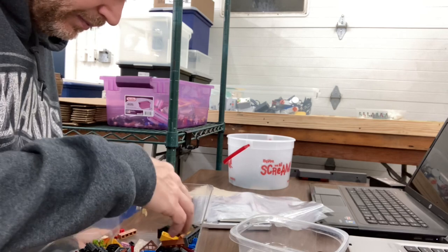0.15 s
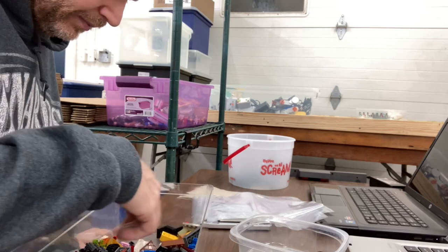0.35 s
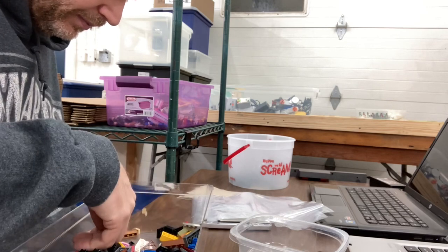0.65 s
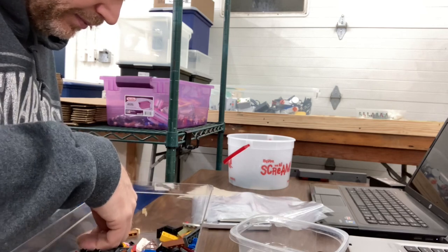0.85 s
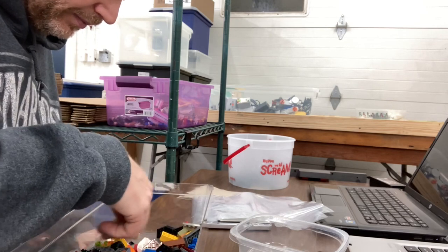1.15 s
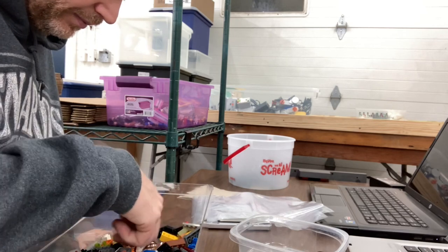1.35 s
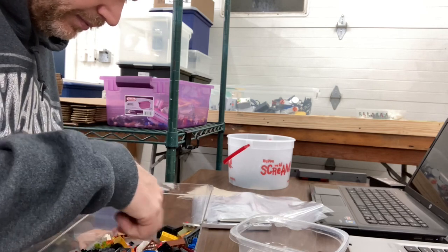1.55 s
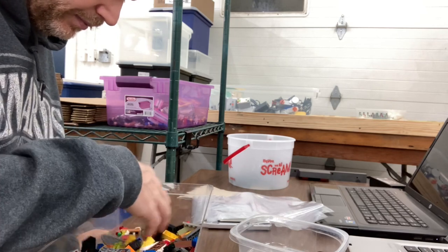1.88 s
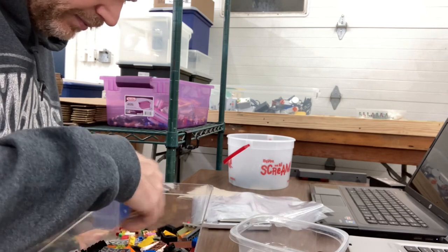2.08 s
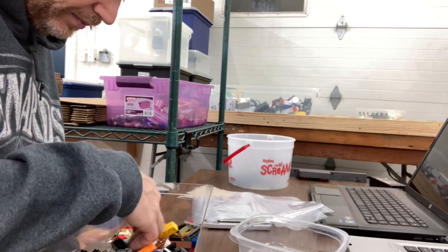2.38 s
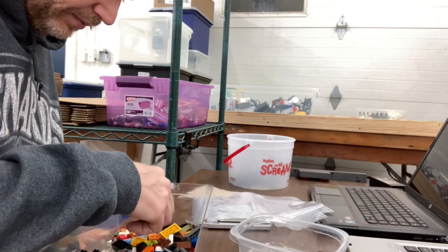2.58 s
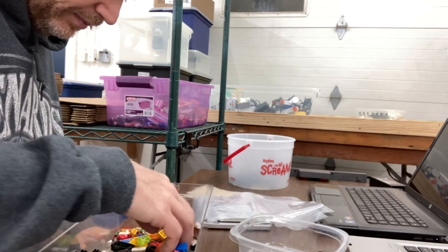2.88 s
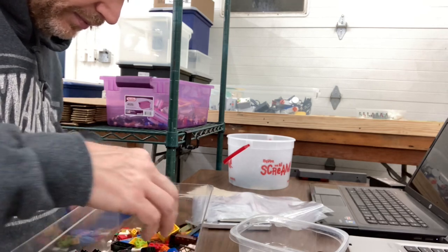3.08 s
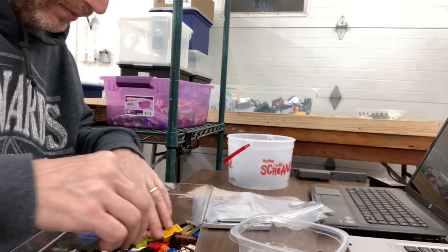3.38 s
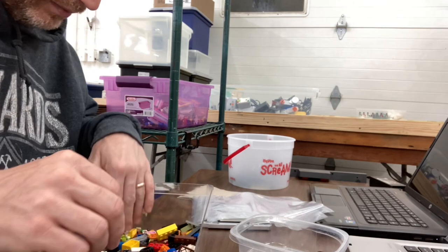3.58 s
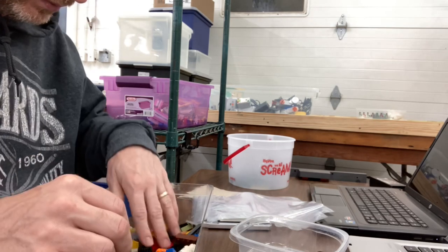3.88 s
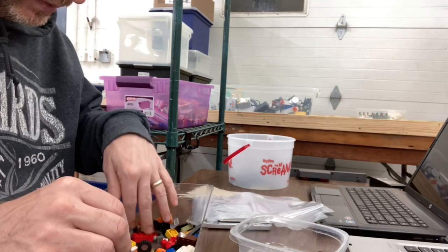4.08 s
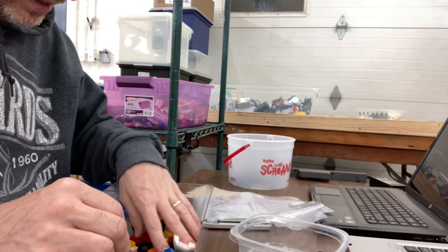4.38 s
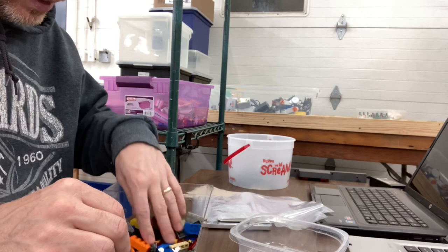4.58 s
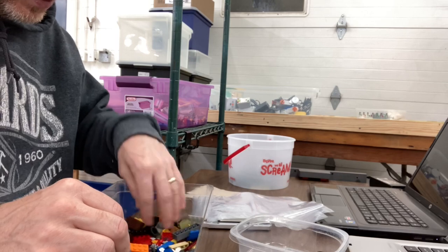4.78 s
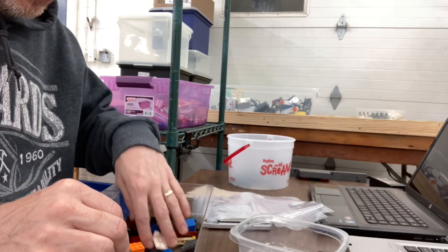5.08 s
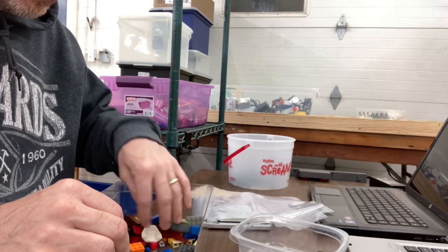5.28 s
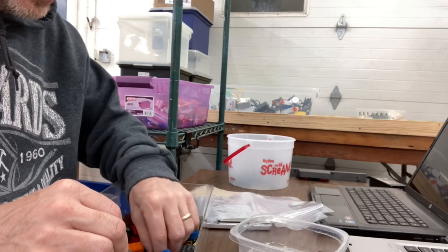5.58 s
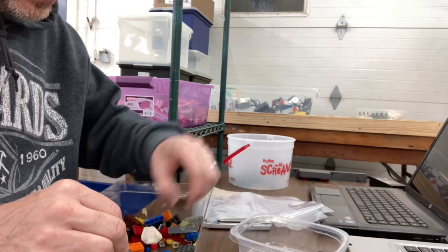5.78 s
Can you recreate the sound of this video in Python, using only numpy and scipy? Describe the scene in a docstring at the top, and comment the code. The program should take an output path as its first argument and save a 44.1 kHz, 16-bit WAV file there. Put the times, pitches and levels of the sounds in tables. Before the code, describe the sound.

Close stereo sound of hands stirring loose plastic toy bricks in a plastic tub, in a modest hard-walled workroom. It opens at once with a loud, crunchy clattering stroke that falls off by about 0.2 s, followed by lighter, scattered clicks and small rattles, notably near 0.5, 0.86 and 1.3 s, with near silence between. Heavy raking starts at 1.67 s: dense showers of bright, dry ticks and clacks over a hollow midrange tub rattle, dipping around 2.0 s, surging at 2.3 s and again near 2.9 s. It thins to almost nothing around 3.2 s. From 3.4 s it returns in uneven strokes, stronger from 3.8 to 4.2 s, again from 4.35 s and around 5 s. A firm clack with a dull bump lands at 5.5 s, then the last pieces settle by 5.7 s. Faint, steady low room tone lies underneath, with short reflections.

```python
"""A hand rakes through loose plastic toy bricks in a plastic tub on a workbench, close to a two-port microphone.
A loud stroke opens; lighter, sparser ones follow until 1.3 s. Heavy raking runs from 1.67 s, thins out
around 3.2 s, returns at 3.4 s and dies away by 5.7 s, over steady room tone throughout.
Strokes drive showers of decaying modes (bricks, tub, studs, bench); clacks are bursts of contacts that
ring the same pieces; bumps are sinking sines; room tone and reflections are shaped noise."""
import sys
import numpy as np
from scipy import signal
from scipy.fft import rfft, irfft, next_fast_len
from scipy.io import wavfile
from scipy.ndimage import uniform_filter1d

SR = 44100
rng = np.random.default_rng(int(sys.argv[2]) if len(sys.argv) > 2 else 0)


def master(y):
    """Save y as 16-bit WAV."""
    cut = np.clip(np.atleast_2d(y).T, -1, 1)
    pcm = np.round(cut * 32767)  # scale
    wavfile.write(sys.argv[1], SR, pcm.astype(np.int16))


N = 261954  # samples


def gain_of(db):
    """Amplitude factor of a level in dB."""
    return 10 ** (np.asarray(db) / 20)


def evened(x):
    """Scale to RMS 1."""
    return x / np.sqrt(np.mean(x ** 2) + 1e-20)


def read(points, hz):
    """Read a (freq_hz, value) curve, linear over log frequency."""
    freq_hz, value = np.transpose(points)
    return np.interp(np.log(hz + 1), np.log(freq_hz + 1), value)


def add(mix, start_s, sound):
    """Add a sound into the mix in place, cut at the end."""
    part = mix[round(start_s * SR):][:len(sound)]
    part += sound[:len(part)]


def pair(shape, same):
    """Two random spectra that are alike by the share same."""
    a, b, c, d = rng.standard_normal((4,) + shape)
    same = np.clip(same, -1, 1)
    left = a + 1j * b
    right = same * left + np.sqrt(1 - same ** 2) * (c + 1j * d)
    return np.array([left, right])


# likeness at both ports, also used by room() and direct(): freq_hz, likeness (share)
PORT_LIKENESS = [(60, 0.94), (340, .9), (860, 0.52), (2400, 0.77), (5000, 0.23), (7000, 1), (8600, 1),
                 (9900, 0.51), (10850, 0.93), (11700, .999), (12500, 0.78), (13800, 1), (15000, .65)]
# room tone spectrum, relative: freq_hz, density_db (per Hz)
AIR_SPECTRUM = [(15, -40), (25, 7.5), (181, -6), (239, -32), (322, -1.5), (506, -26), (1220, -21),
                (1560, -37.5), (6060, -59), (10000, -38.5), (13000, -52), (22000, -120)]
AIR_DB = -63.5


def air():
    """Steady room tone, mostly low: noise shaped by a spectrum."""
    hz = np.fft.rfftfreq(1024, 1 / SR)[:, None]
    z = pair((513, N // 256 + 5), read(PORT_LIKENESS, hz)) * gain_of(read(AIR_SPECTRUM, hz))
    noise = signal.istft(z, nperseg=1024, noverlap=768)[1][:, :N]
    return gain_of(AIR_DB) * evened(noise)


# decay of the reflections: freq_hz, t60_s
ROOM_DECAY = [(100, 0.13), (600, 0.32), (2000, 0.28), (6000, 0.25), (14000, 0.1)]


def room(x):
    """Dense reflections from bench, shelves and walls, each band dying at its own speed."""
    hz, t = np.fft.rfftfreq(256, 1 / SR)[:, None], np.arange(420) * 64 / SR
    out = np.zeros((2, N))
    turn = 2 * np.pi * 3.1 * np.arange(N) / SR  # 3.1 Hz
    for k in range(3):  # the hand moves, so the paths keep changing
        z = pair((129, 420), read(PORT_LIKENESS, hz)) * gain_of(-60 * t / read(ROOM_DECAY, hz))
        tail = signal.istft(z, nperseg=256, noverlap=192)[1]
        tail = np.pad(tail / np.linalg.norm(tail[0]), ((0, 0), (70, 0)))
        share = np.cos(turn + k * 2 * np.pi / 3) * np.sqrt(2 / 3)
        out += signal.fftconvolve((x * share)[None], tail, axes=1)[:, :N]
    return out


def direct(x):
    """The tub walls scatter the near sound, so the right port gets a share by other short paths."""
    paths = rng.standard_normal((8, 60)) * np.exp(-np.arange(60) / 13.0)
    # the busy spot is redrawn every 300 samples
    spot = np.repeat(rng.integers(0, 8, N // 300 + 1), 300)[:N]
    other = np.zeros(N)
    for k, path in enumerate(paths):
        busy = uniform_filter1d(1. * (spot == k), size=150).clip(0)
        other += np.convolve(x * np.sqrt(busy), path / np.linalg.norm(path))[:N]
    size = next_fast_len(N + 4096)
    same = np.clip(read(PORT_LIKENESS, np.fft.rfftfreq(size, 1 / SR)), -1, 1)
    right = same * rfft(x, size) + np.sqrt(1 - same ** 2) * rfft(other, size)
    return np.array([x, irfft(right, size)[:N]])


# the hand bumps the tub against the bench: start_s, level_db, settled_pitch_hz, t60_s
TUB_BUMPS = [(0.525, -42, 115, 0.1), (0.551, -37, 96, 0.1), (1.309, -40.5, 88.8, 0.12),
             (1.68, -35, 80, 0.12), (2.284, -42.5, 137, 0.12), (3.379, -38, 48.4, 0.12),
             (4.372, -37, 59.1, 0.1), (5.496, -30, 190, .07), (5.5, -31, 85, .1)]


def bumps():
    """A dull push whose pitch sinks as the bench settles."""
    out, t = np.zeros(N), np.arange(SR // 4) / SR
    for start_s, level_db, pitch_hz, t60_s in TUB_BUMPS:
        turns = pitch_hz * (t + .006 * (1 - np.exp(-t / 0.0088)))
        swell = 1 - np.exp(-t / .004)
        decay = gain_of(level_db + 2.0 - 60 * t / t60_s)
        add(out, start_s, decay * np.sin(2 * np.pi * turns) * swell)
    return out


def ring(hz, db, t60_s, size):
    """A struck piece: decaying modes, each swelling over its first cycle, with energy 1."""
    t = np.arange(size)[:, None] / SR
    swell = 1 - np.exp(-t * hz / 0.69)
    x = (gain_of(db - 60 * t / t60_s) * np.sin(2 * np.pi * hz * t) * swell).sum(1)
    return x / np.linalg.norm(x)


# spans of modes and base t60 (each mode 0.33 to 2.33 times it): larger bricks, studs and small pieces, bench
BRICK_HZ, BRICK_T60_S = (1508, 6790), 0.0072
TICK_HZ, TICK_T60_S = (4800, 14800), 0.0026
THUD_HZ, THUD_T60_S = (44.7, 225), .08


def piece(span_hz, t60_s, size, count=14, crowd=1.448):
    """One piece of unknown shape: modes scattered over a span, more of them low."""
    a, b, c = rng.random((3, count))
    low_hz, high_hz = span_hz
    return ring(low_hz + (high_hz - low_hz) * a ** crowd, -6 * b, t60_s * (0.33 + 2.0 * c), size)


# tub modes before detuning: freq_hz, relative_level_db, t60_s
TUB_MODES = [(406.4, -7, 0.12), (324, -22, 0.06), (367.4, -12.5, 0.043), (520, -5, 0.031),
             (631, 1.5, 0.032), (705.6, 1, 0.043), (806, 5.5, 0.03), (923, 9.5, 0.016), (1181, -2, 0.072),
             (1274, 2, 0.04), (1494, -9, 0.034)]


def tub_spot():
    """The tub struck at some spot: each mode is fed by another amount, and the load of bricks detunes it."""
    hz, db, t60_s = np.transpose(TUB_MODES)
    detune, feed = rng.standard_normal((2, len(hz)))
    return ring(hz * (1 + 0.037 * detune), db + 3 * feed, t60_s, size=4000)


def chatter(length_s):
    """Forty tiny contacts that swell and fade over 1.6 times the nominal length of a clack."""
    when, size = rng.random((2, 40))
    out = np.zeros(1400)
    at = np.clip(when * 1.6 * length_s * SR, 0, 1399).astype(int)
    out[at] = (2 * size - 1) * np.sin(np.pi * when ** 0.67) ** 1.5
    return out


# clacks that stand out: time_s, level_db, brightness_db, chatter_length_s (nominal)
LOUD_CLACKS = [(.008, -16, 0, .012), (.061, -24.5, 8, .0043), (.194, -34, 10, .003), (.2038, -25, 3, .005),
               (.2274, -28.5, 12, .007), (.258, -31, 15, .005), (.2979, -31.5, -1, .004),
               (.503, -34.5, -1, .0044), (.528, -32, 1, .006), (.548, -34, 9, .0054), (.635, -50, 0, .004),
               (.76, -57, -12, .008), (.859, -29, -4, .0096), (1.0157, -49, 6, .004),
               (1.0786, -50, 1, .003), (1.092, -39, -5, .012), (1.3084, -32, 3, .015),
               (1.364, -40, 6, .003), (1.396, -36, 1, .016), (1.6793, -26, 14, .01), (1.708, -24, 3, .011),
               (1.7214, -24, 7, .015), (1.835, -19, 7, .017), (1.8747, -21.5, 5, .014),
               (1.9591, -26, 0, .005), (2.003, -32.5, 2, .005), (2.132, -38, 6, .002),
               (2.1593, -35.5, 6, .004), (2.1762, -25, -1, .01), (2.273, -22, -2, .008),
               (2.29, -18.5, 7, .006), (2.324, -19.5, 11, .015), (2.35, -15.5, -1, .0055),
               (2.367, -17, 3, .0046), (2.482, -34.5, 9, .008), (2.527, -24, 0, .009),
               (2.602, -38, -8, .002), (2.6727, -42, 10, .0046), (2.706, -29.5, 5, .005),
               (2.7479, -29, 6, .009), (2.8054, -21, -1, .007), (2.85, -20, 1, .006),
               (2.8756, -21.5, 0, .007), (2.8927, -19, 2, .005), (2.9655, -21.5, 0, .012),
               (3.018, -33, -1, .0085), (3.0569, -30.5, -1, .004), (3.3816, -31, -1, .018),
               (3.4533, -32, 2, .0045), (3.489, -27, 5, .005), (3.5, -23, 11, .01), (3.539, -24, 4, .002),
               (3.549, -22, 7, .011), (3.5783, -23, 1, .005), (3.6073, -25, 9, .008), (3.664, -38, 5, .009),
               (3.692, -40, 8, .004), (3.708, -41, 12, .002), (3.837, -23, 3, .008),
               (3.868, -27, 16, .0025), (3.9288, -17, -4, .006), (3.99, -20, -8, .006),
               (4.0257, -20, 4, .007), (4.046, -24, 9, .007), (4.0578, -23, 1, .005), (4.086, -27, 7, .004),
               (4.1205, -14.5, -6, .006), (4.184, -20, 1, .007), (4.3023, -36, -4, .01),
               (4.3468, -20, 0, .009), (4.3743, -19.5, 4, .011), (4.393, -21, 12, .005),
               (4.6534, -31, -8, .0056), (4.679, -22.5, -3, .008), (4.695, -25, 3, .011),
               (4.755, -25, 2, .006), (4.7838, -28, -3, .004), (4.944, -20, 7, .016),
               (5.0625, -24, 1, .0056), (5.0793, -22, 0, .014), (5.1195, -19.5, 2, .0036),
               (5.169, -24, 1, .005), (5.2013, -22.5, 4, .008), (5.234, -24, 2, .005),
               (5.273, -27, 1, .012), (5.296, -25, 0, .009), (5.375, -32, 7, .003),
               (5.496, -17.5, -1, .012), (5.545, -36, 3, .003), (5.645, -41, 3, .006),
               (5.676, -36, 6, .009)]
CLACK_BRICK_DB, CLACK_TUB_DB, CLACK_STUD_DB = -1.8, .3, -2.1  # shares at brightness 0
# dB per dB: bright clacks miss the tub and ring studs, dull ones miss the studs
TUB_LOSS, STUD_GAIN, STUD_LOSS = 1.4, .6, 2.1


def clacks():
    """A brick lands and jostles its neighbours: three bricks, their studs and the tub ring."""
    out = np.zeros(N)
    for time_s, level_db, bright_db, length_s in LOUD_CLACKS:
        bricks = [piece(BRICK_HZ, BRICK_T60_S, size=1200, count=20) for _ in range(3)]
        studs = [piece(TICK_HZ, TICK_T60_S, size=500, count=20) for _ in range(3)]
        bright, dull = max(bright_db, 0), min(bright_db, 0)
        layers = [(bricks, CLACK_BRICK_DB),
                  ([tub_spot()], CLACK_TUB_DB - TUB_LOSS * bright),
                  (studs, CLACK_STUD_DB + STUD_GAIN * bright + STUD_LOSS * dull)]
        for pieces, share_db in layers:
            blow = sum(np.convolve(chatter(length_s), p) for p in pieces)
            strongest = np.sqrt(2 * uniform_filter1d(blow ** 2, size=110).max())
            add(out, time_s - .3 * length_s, gain_of(level_db + share_db) * blow / strongest)
    return out


# strokes of the hand: start_s, rise_s, top_db, hold_s, end_db (clatter as the hand lets go)
HAND_STROKES = [ (0.0, .002, -20, .11, -32), (.195, .01, -36, .03, -40), (.26, .02, -46, .06, -56),
                (.45, .005, -62, .04, -62), (.495, .027, -38.5, .02, -42), (.8, .06, -44, .002, -44),
                (.855, .008, -37, .012, -40), (1.0, .02, -60, .07, -55), (1.285, .012, -42.5, .1, -44),
                (1.667, .045, -21, .14, -24), (1.87, .02, -26, .1, -33), (2.0, .02, -40, .1, -54),
                (2.17, .008, -34, .09, -42), (2.27, .02, -21, .13, -28), (2.44, .03, -35, .14, -42),
                (2.62, .02, -48, .07, -54), (2.698, .008, -34, .185, -25), (2.93, .045, -32, .06, -40),
                (3.08, .02, -54, .27, -74), (3.35, .028, -52, .002, -52), (3.376, .006, -35.5, .01, -37),
                (3.45, .035, -34.5, .1, -35), (3.64, .02, -48, .06, -52), (3.803, .012, -27, .08, -25),
                (3.9, .01, -28, .16, -31), (4.105, .012, -33, .08, -42), (4.25, .02, -52, .08, -50),
                (4.342, .015, -22, .07, -21), (4.44, .02, -26, .31, -33), (4.83, .02, -52, .1, -60),
                (4.934, .01, -28, .07, -30), (5.0, .08, -24, .06, -29), (5.16, .02, -33, .14, -37),
                (5.33, .02, -44, .04, -50), (5.466, .005, -48, .015, -48), (5.485, .012, -28, .02, -33),
                (5.54, .02, -45, .14, -53)]
RISE_FROM_DB, SETTLE_DB_PER_S, REST_DB = -18, 250, -80  # rise start is relative to the top


def stirring():
    """Clatter level in dB: each stroke swells, holds, and dies away as the pile settles."""
    t, power = np.arange(0, N, 16) / SR, gain_of(2 * REST_DB)
    for start_s, rise_s, top_db, hold_s, end_db in HAND_STROKES:
        held_db = np.interp(t - start_s, [0, rise_s, rise_s + hold_s],
                            [top_db + RISE_FROM_DB, top_db, end_db])
        settling_s = np.maximum(t - start_s - rise_s - hold_s, 0)
        power = power + (t >= start_s) * gain_of(2 * (held_db - SETTLE_DB_PER_S * settling_s))
    return np.interp(np.arange(N) / SR, t, 10 * np.log10(power))


def shower(pieces, per_s, spread_db, clump):
    """Collisions at random moments, few large and many small, bunched by clump, shared among the pieces."""
    size = gain_of(spread_db * np.minimum(rng.exponential(1, N), 3.6))
    size = size * (rng.random(N) < per_s * clump / SR)
    which = rng.integers(0, len(pieces), N)
    return [size * (which == k) for k in range(len(pieces))], np.sqrt(np.mean(size ** 2))


FULL_DB = -25  # clatter of a full stroke
# *_FOLLOWS: dB per dB of clatter
TUB_DB, TUB_FOLLOWS = -7.5, .78  # against a full stroke
TICK_DB, TICK_FOLLOWS = -.3, 1.3  # against a full stroke; ticks fade first when the hand eases
THUD_DB, THUD_FOLLOWS, THUD_LAG_S = -56.5, .3, .06  # the bench follows the load slowly
BRICKS_PER_S, TUB_HITS_PER_S, TICKS_PER_S, THUDS_PER_S = 1200, 600, 2700, 120


def raking():
    """Bricks tumble in small avalanches: all four layers bunch together and follow the hand."""
    brick_db = stirring()
    eased_db = brick_db - FULL_DB
    keep = np.exp(-1 / (THUD_LAG_S * SR))
    load_db = signal.lfilter([1 - keep], [1, -keep], eased_db)
    drift = uniform_filter1d(uniform_filter1d(rng.standard_normal(N), 300), 300)
    clump = gain_of(4.5 * evened(drift))
    clump = clump / clump.mean()
    bricks = [piece(BRICK_HZ, BRICK_T60_S, size=1800) for _ in range(24)]
    tub = [tub_spot() for _ in range(20)]
    ticks = [piece(TICK_HZ, TICK_T60_S, size=700) for _ in range(24)]
    thuds = [piece(THUD_HZ, THUD_T60_S, size=8000) for _ in range(8)]
    layers = [(bricks, BRICKS_PER_S, 2.6, brick_db - 3.2),
              (tub, TUB_HITS_PER_S, 3.5, FULL_DB + TUB_DB + TUB_FOLLOWS * eased_db),
              (ticks, TICKS_PER_S, 2.7, FULL_DB + TICK_DB + TICK_FOLLOWS * eased_db),
              (thuds, THUDS_PER_S, 3.0, THUD_DB + THUD_FOLLOWS * load_db)]
    out = np.zeros(N)
    for pieces, per_s, spread_db, level_db in layers:
        trains, rms = shower(pieces, per_s, spread_db, clump)
        force = gain_of(level_db) / rms
        for train, p in zip(trains, pieces):
            out += signal.oaconvolve(train * force, p)[:N]
    return out


def scene():
    """Near sounds heard directly and by the room, over room tone."""
    near = raking() + clacks() + bumps()
    return gain_of(-1.38) * direct(near) + gain_of(-10.5) * room(near) + air()


# microphone response: freq_hz, gain_db
MIC_COLOUR = [(30, -19.5), (60, -2), (250, 3.5), (1000, -2), (1500, 0), (2400, 6.5), (3300, 2.5),
              (4200, 0.5), (5000, -2.5), (6500, 1), (9000, 5), (12000, 4), (15500, -4.5)]
# the ports lie apart: freq_hz, left_lead_rad
PORT_LEAD = [(60, 0), (860, .4), (1900, .1), (4500, -.1), (5500, 2.8), (7060, 4.2), (8500, 6.3),
             (9200, 6.3), (10800, 9.3), (11700, 9.55), (13300, 12.5), (14500, 12.6), (15400, 15.3)]
# level between the ports: freq_hz, left_minus_right_db
PORT_LEVEL = [(60, 1), (290, 0.5), (640, -1.5), (1410, -1.5), (3100, -3.5), (6820, -1.5), (10700, 0.5),
              (11800, -2), (15000, 0)]
EDGE_HZ = 15760


def record(dry):
    """The two ports hear the tub with their own phase and balance; then the band limit."""
    size = next_fast_len(N + 4096)
    hz = np.fft.rfftfreq(size, 1 / SR)
    half = gain_of(read(PORT_LEVEL, hz) / 2) * np.exp(.5j * read(PORT_LEAD, hz))
    spectra = rfft(dry, size) * gain_of(read(MIC_COLOUR, hz)) * np.array([half, 1 / half])
    ports = irfft(spectra, size)[:, :N]
    edge = signal.firwin(1023, EDGE_HZ, window=("kaiser", 8), fs=SR)
    return signal.oaconvolve(ports, edge[None], "same")


dry = scene()
out = record(dry)
master(out)
```